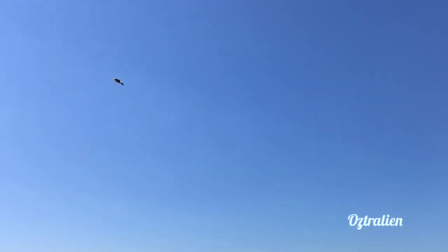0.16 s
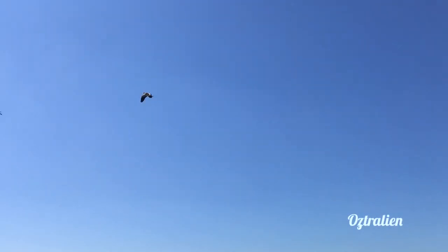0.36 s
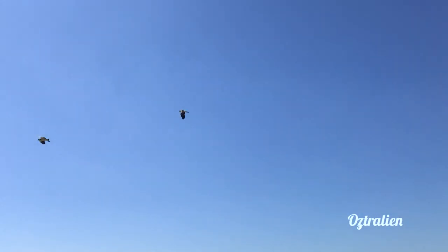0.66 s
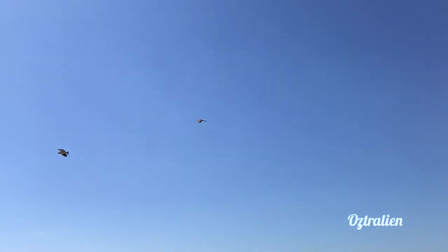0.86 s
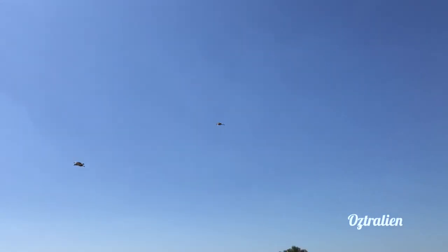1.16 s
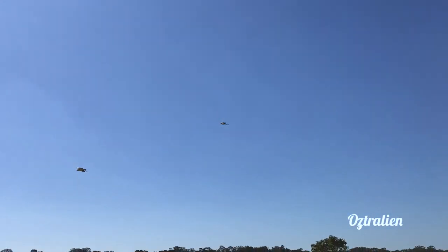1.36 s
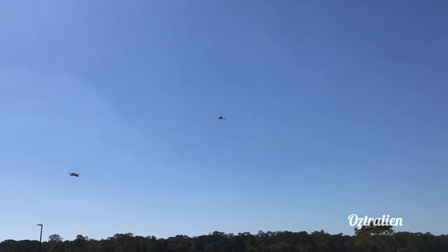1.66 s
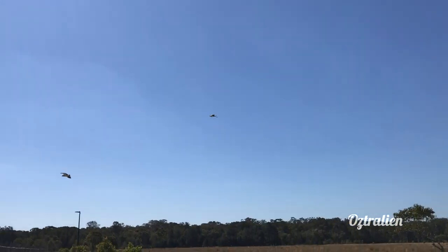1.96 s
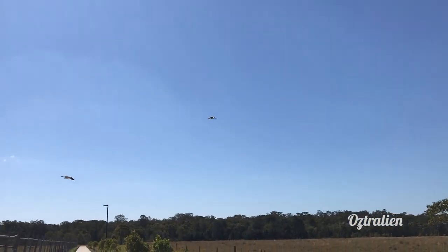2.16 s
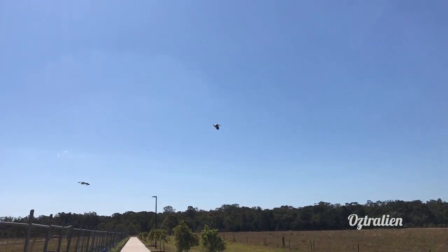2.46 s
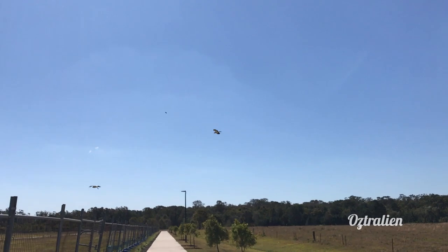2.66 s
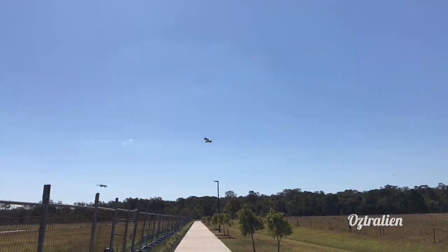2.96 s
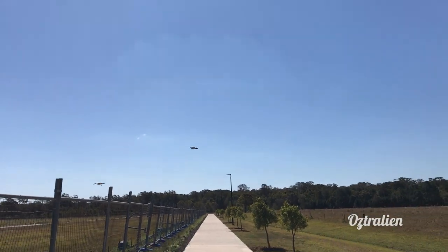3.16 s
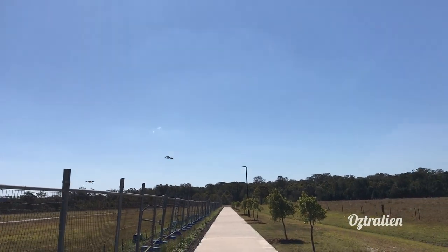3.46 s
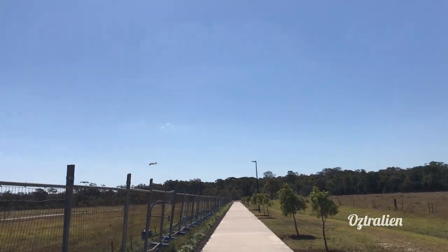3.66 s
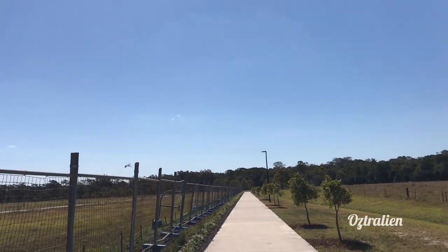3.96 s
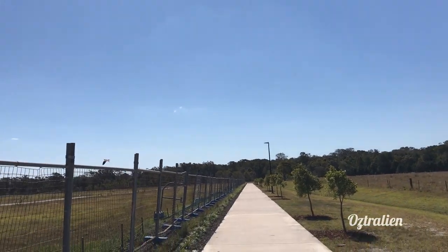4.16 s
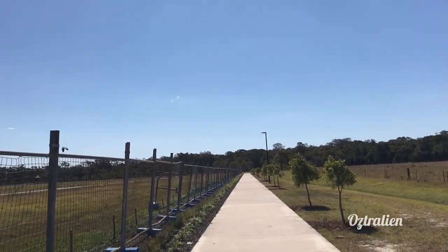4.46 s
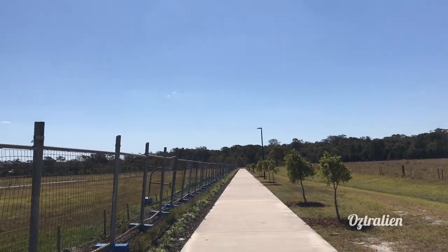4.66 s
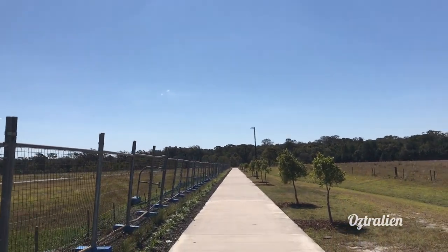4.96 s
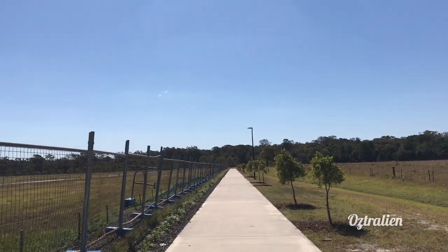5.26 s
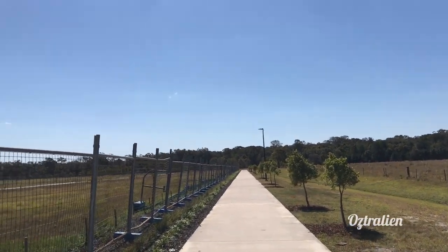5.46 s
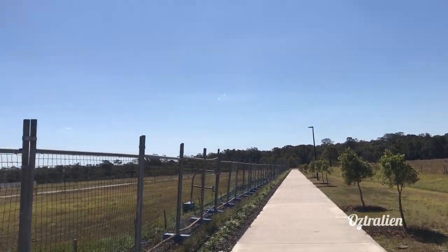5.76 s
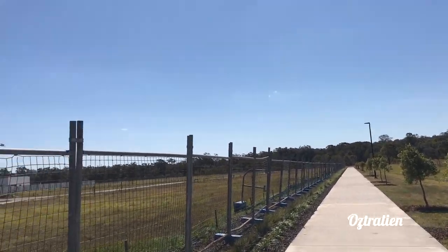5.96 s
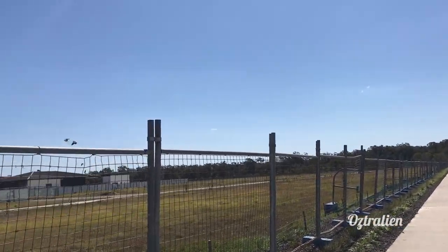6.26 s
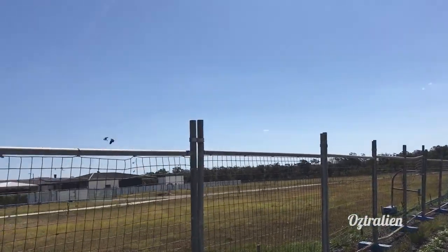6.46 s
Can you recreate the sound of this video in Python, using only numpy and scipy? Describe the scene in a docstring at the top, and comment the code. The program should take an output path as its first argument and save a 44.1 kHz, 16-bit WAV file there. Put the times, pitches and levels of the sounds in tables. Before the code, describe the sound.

Shrill, stuttering alarm calls from flying lapwings, close and dry with a slight echo off the ground and field. Two strong bursts come in the first half amid soft, bassy wind buffeting on an unprotected microphone. A quieter middle has weak far keks, small clicks and drawn-out calls; finally rapid keks mixed with short wails return as the air stays calm.

```python
"""Lapwings scolding over a windy field

Lapwings scold in bursts of stuttered 'kek' calls, with a few lower, drawn-out wails in between. Each voice is a
stack of harmonics shaped by a throat; the ground and field throw delayed copies back. Gusts of filtered noise
buffet the microphone, with short puffs on its port and a few small dry clicks. Behind it all lies a faint
background hush, made of noise whose middle range swells slowly."""
import sys
import numpy as np
from scipy import signal
from scipy.fft import rfft, irfft, next_fast_len
from scipy.io import wavfile

SR = 44100
rng = np.random.default_rng(int(sys.argv[2]) if len(sys.argv) > 2 else 0)


def store_pcm(level_fs):
    """Save levels as 16-bit WAV."""
    pcm = np.round(np.clip(level_fs, -1, 1) * 32767).astype(np.int16)
    wavfile.write(sys.argv[1], SR, np.atleast_2d(pcm).T)


N = 291060
TIME = np.arange(N) / SR

# a faint call is a far one: scatter and echo lose less than the direct sound as the level falls
NEAR_DB, SCATTER_DB_PER_DB, ECHO_DB_PER_DB = -40, .48, .68

# The short calls; an opening of 0 means a lone pip, a closing of 0 means no closing note:
# (time [s], opening length [s], short chirps [count], closing length [s], break after each rising chirp [s],
#  pitch [Hz], level of the last syllable [dB], 5-6 kHz presence [dB], top treble [dB])
KEKS = [(.252, .055, 0, .05, 0, 1250, -61, 5, -2), (.478, 0, 0, 0.05, 0, 1262, -32, 2.5, 9.5),
        (.625, .020, 1, 0.033, .001, 1280, -30.5, 3.5, 10.5),
        (.744, .017, 1, .040, .001, 1232, -30.5, 3.5, 9), (.869, .018, 2, 0.031, .002, 1206, -32, 2.5, 8.5),
        (1.115, 0.05, 1, 0.05, 0, 1230, -56, -3, 1), (1.357, 0.048, 0, 0.037, 0, 1158, -60.5, -3.5, -4),
        (1.539, .068, 0, .054, 0, 1178, -59.5, 2.5, -7), (2.123, .037, 0, .026, .001, 1285, -53.5, -7, -3),
        (2.258, 0.035, 0, 0.014, .002, 1305, -51, 1, -9), (2.309, 0, 0, .042, 0, 1245, -30, 6, 6.5),
        (2.418, .029, 1, 0.029, .002, 1218, -31.5, 5.5, 7.5),
        (2.534, 0.03, 0, 0.024, .001, 1215, -34, 4, 6), (2.636, .031, 1, 0.029, .003, 1218, -34.3, 6, 5.5),
        (2.747, .030, 1, .026, .004, 1202, -35.5, 6, 6.5),
        (2.901, .030, 0, 0.026, .004, 1217, -39, 4.5, 6.5),
        (3.014, .026, 0, 0.032, .005, 1205, -39.5, 5.5, 6.5),
        (3.228, 0.025, 0, 0.037, 0, 1252, -62, -4, -1), (3.363, 0.03, 1, 0.031, .004, 1275, -60, 1.5, -5),
        (3.513, .034, 1, .034, .005, 1250, -60, -1, 2), (3.685, 0.028, 0, 0.036, 0, 1215, -65.5, -5, -4),
        (4.005, .025, 0, 0.025, .004, 1295, -67.5, -2, -4),
        (4.095, .025, 2, 0.018, .007, 1130, -63.5, 1.5, -4),
        (4.227, 0.045, 0, 0.029, .006, 1144, -56.5, -1.5, -7),
        (5.435, 0.00042, 0, 0.025, 0, 1212, -48, -12, -12), (5.590, 0, 0, .041, 0, 1298, -37.5, 0, -7),
        (5.732, .019, 2, .029, .005, 1297, -37, 4, 3.5), (5.864, .020, 1, .025, .005, 1218, -34, 1, 3.5),
        (5.941, .019, 0, 0, .004, 1240, -46, -10, -4), (5.965, .028, 2, .030, .005, 1230, -37, 0, 5),
        (6.082, .029, 2, .031, .005, 1322, -42.3, -3, -4), (6.241, 0.037, 2, 0, .005, 1310, -45, -2, -8),
        (6.311, 0, 0, .047, 0, 1250, -40, 3, 4), (6.459, .025, 0, 0.022, .005, 1252, -40.5, 2.5, 4),
        (6.539, 0.027, 0, .025, .003, 1246, -38.5, 2, 3)]
# The drawn-out calls:
# (time [s], length [s], pitch [Hz], glide [Hz], level [dB], presence [dB], top treble [dB])
WAILS = [(4.465, 0.18, 1064, 48, -61, -6, -2), (4.753, 0.12, 1089, 16, -52, -3.5, -7),
         (5.201, 0.12, 1089, -15, -49.5, -1, 1), (5.784, 0.116, 1101, 0.5, -42, -6, -9),
         (6.564, 0.091, 1099, 0, -41.5, 2.5, -1)]


def lapwings(ground_db=-15.5, ground_s=0.0072, scatter_db=-18, wail_scatter_db=-11,
             echo_db=-8, kek_echo_db=-24, echo_s=0.105, doppler_hz=14):
    """Keks and wails with their reflections; the farther a bird, the larger the share from the field."""
    keks, to_scatter, wails, to_echo = np.zeros((4, N))
    for s, opening_s, count, closing_s, break_s, pitch_hz, db, presence_db, treble_db in KEKS:
        sound = undb(db) * call(opening_s, count, closing_s, break_s, pitch_hz, presence_db, treble_db)
        far_db = NEAR_DB - db
        add(keks, s, sound)
        add(to_scatter, s, undb(scatter_db + SCATTER_DB_PER_DB * far_db) * sound)
        add(to_echo, s, undb(kek_echo_db + ECHO_DB_PER_DB * far_db) * sound)
    for s, length, pitch_hz, glide_hz, db, presence_db, treble_db in WAILS:
        add(wails, s, undb(db) * wail(length, pitch_hz, glide_hz, presence_db, treble_db))
        # the bird flies towards the edge of the field, so its echo is a little higher
        higher = wail(length, pitch_hz + doppler_hz, glide_hz, presence_db, treble_db)
        add(to_echo, s, undb(db + echo_db) * higher)
    ground_lag_s = ground_s * (1 + 0.1095 * wobble(0.466, N))
    ground = undb(ground_db) * delayed(keks, ground_lag_s)
    echo = field(delayed(to_echo, echo_s), t60_s=0.14, build_s=.002)
    scatter = field(to_scatter + undb(wail_scatter_db) * wails, t60_s=0.8, build_s=0.009)
    return keks + wails + ground + echo + scatter


CRESCENDO_DB = 1.8  # each syllable is this much louder than the one before
LIFT_HZ_PER_S = 6000  # a chirp cut short by a longer break is pushed higher


def call(opening_s, count, closing_s, break_s, pitch_hz, presence_db, treble_db):
    """One kek: its syllables follow each other and build up to the last."""
    parts = syllables(opening_s, count, closing_s, break_s)
    out, s = np.zeros(SR // 2), 0
    for k, (length, silent_s, kind) in enumerate(parts):
        lifted_hz = pitch_hz + LIFT_HZ_PER_S * silent_s
        sound = syllable(length - silent_s, lifted_hz, presence_db, treble_db, kind)
        add(out, s, undb(CRESCENDO_DB * (k + 1 - len(parts))) * sound)
        s += length
    return out


STUTTER_S = .0185  # from one short chirp to the next

# Four kinds of syllable: a rising opening, a short rising chirp, a falling closing note, a lone pip:
# (pitch against the call's [ratio], glide [Hz], arch [Hz], rasp [0-1], time for the rasp to settle [s],
#  place of the peak [0-1], bite of the onset [0-1])
OPENING = (.985, 200, 0, .55, .0065, .56, .07)
CHIRP = (1.02, 185, 10, .52, .0042, .47, .1)
CLOSING = (1.0, -100, 30, .33, .004, .39, .12)
PIP = (1.0, 25, 80, .27, .0045, .48, .035)


def syllables(opening_s, count, closing_s, break_s):
    """The syllables of one kek in order: (time until the next [s], silent part of it [s], kind)."""
    if opening_s <= 0:
        return [(closing_s, 0, PIP)]
    rising = [(opening_s, break_s, OPENING)] + [(STUTTER_S, break_s, CHIRP)] * round(count)
    if closing_s > 0:
        return rising + [(closing_s, 0, CLOSING)]
    return rising


def syllable(length, pitch_hz, presence_db, treble_db, kind, dull_db=5, quiver_db=.7,
             hoarse=.23, scoop=.028, drawl=.45, fullness=.9):
    """A rasping catch, then an arched tone; the kind sets where it peaks, and long ones glide less."""
    ratio, glide_hz, arch_hz, rasp, settle_s, peak, bite = kind
    t = np.arange(int(length * SR)) / SR
    u = t / length
    start = np.exp(-t / settle_s)
    # pitch: a scoop from below, a straight glide and an arch
    scooped_hz = pitch_hz * ratio * (1 - scoop * start)
    glide = glide_hz * (STUTTER_S / length) ** drawl * (u - .5)
    hz = scooped_hz + glide - arch_hz * (2 * u - 1) ** 2
    # bend time so that the half sine peaks at the wanted place
    bend = np.log(.5) / np.log(min(peak, .9))
    swell = abs(np.sin(np.pi * u ** bend)) ** fullness
    breakout = bite * start * np.minimum(t / 0.0012, 1)
    # the membranes close hardest at full pressure, so the edges of a syllable are duller
    soft_db = dull_db * (swell - 1)
    pressure = unit((swell + breakout) * undb(quiver_db * wobble(90, len(t))))
    rough = rasp * (1.8 * start + hoarse)
    return pressure * syrinx(hz, rough, presence_db + soft_db / 2, treble_db + soft_db)


# How a wail runs its course: (share of its length [0-1], pitch [ratio], level [dB])
WAIL_SHAPE = [(0, .94, -16), (.12, 1.015, -1), (.33, .997, -2.5), (.55, .983, -1.5), (.75, .995, 1.5),
              (.93, .983, 4), (1, 0.94, -3.5)]


def wail(length, pitch_hz, glide_hz, presence_db, treble_db, tremor_db=1.9):
    """A lower, clear, held call: nearly even membrane pulses with a slight quaver."""
    u = np.linspace(0, 1, int(length * SR))
    share, ratio, db = np.transpose(WAIL_SHAPE)
    waver = 1 + .004 * wobble(60, len(u))
    hz = (pitch_hz + glide_hz * (u - .5)) * np.interp(u, share, ratio) * waver
    swell = unit(undb(np.interp(u, share, db) + tremor_db * wobble(86, len(u))))
    voice = swell * syrinx(hz, .06, presence_db, treble_db)
    return colour(voice, [(1100, -0.5), (2200, -0.5), (3200, 0.5), (6000, 1.5),
                          (7200, 0), (9000, 3.5), (14000, -15)])


# How throat and open bill favour some pitches: (frequency [Hz], relative level [dB])
THROAT = [(1050, -19.5), (1280, -14), (2100, 1.6), (2500, 0.3), (3750, 2), (5000, -10), (6250, -10.5),
          (7300, -29), (8700, -29.2), (10000, -31), (11400, -30.5), (13500, -32.5), (15500, -44)]


def syrinx(hz, rough, presence_db, treble_db, jitter=0.053, shimmer=1.0, flutter_hz=700,
           scatter_db=0.0, drift_db=2, count=13):
    """Membrane pulses through the throat; when rough, cycles vary in length and strength."""
    size = len(hz)
    uneven_hz = hz * (1 + jitter * rough * wobble(flutter_hz, size))
    phase = 2 * np.pi * np.cumsum(uneven_hz) / SR
    strength = 1 + np.tanh(shimmer * rough * wobble(flutter_hz, size))
    k = np.arange(1, count + 1)[:, None]  # harmonic numbers
    # the bill beams its upper harmonics: they change from call to call as the bird turns
    upper = np.clip((k * hz - 3900) / 800, 0, 1)
    top = np.clip((k * hz - 6600) / 1900, 0, 1)
    beam_db = (upper - top) * presence_db + top * treble_db
    drift = np.array([wobble(61, size) for _ in range(count)])
    gain = undb(spectrum_db(THROAT, k * hz) + beam_db + (scatter_db + drift_db * top) * drift)
    # the windpipe rings, spreading each pulse over its cycle
    spread = np.pi * k ** 2 / (2 * count) + .5 * drift
    pulses = strength * np.sum(gain * np.cos(k * phase - spread), axis=0)
    # scale by the second and third harmonics
    body = np.sqrt(np.mean(np.sum(gain[1:3] ** 2, axis=0)) / 2)
    return pulses / body


def field(x, t60_s, build_s):
    """Scatter from grass, fence and trees: a thin, fading noise tail that has lost its top."""
    t = TIME[:SR]
    tail = rng.standard_normal(SR) * undb(-60 * t / t60_s) * (1 - np.exp(-t / build_s))
    tail = colour(tail, [(1200, -5.0), (2500, -2.5), (4000, -5.5), (6200, -5.5),
                         (9000, -4.0), (15000, -30)])
    return signal.fftconvolve(x, unit(tail))[:N] / np.sqrt(SR * np.pi)


# Tone of the wind, low rumble and higher buffeting: (frequency [Hz], relative level [dB per Hz])
RUMBLE = [(12, -43.5), (25, -18.5), (38, 11), (55, 18.5), (85, 16), (130, 5), (250, -56.5)]
BUFFET = [(50, -11.5), (110, 2.5), (180, 2.5), (270, -5), (400, -16.5), (600, -23.5), (900, -39.5),
          (1400, -54), (2500, -78), (6000, -96)]


def wind(rumble_db=-1, buffet_db=-1, flicker_db=1.5, own_db=1.6, reach=0.48, usual_db=-37):
    """Eddies on the microphone: a low rumble, and buffeting that reaches higher in stronger gusts."""
    low_db, gust_db = wind_force()
    eddies_db = flicker_db * wobble(57, N)
    out = unit(colour(rng.standard_normal(N), RUMBLE)) * undb(low_db + rumble_db)
    force_db = np.maximum(gust_db - usual_db, -10)
    for hz, band in octaves(BUFFET):
        # small eddies, which make the upper bands, come and go most abruptly
        height = np.clip(np.log2(hz / 180), 0, 2)
        shared_db = eddies_db * (1.5 + 0.78 * height)
        reach_db = reach * force_db * height
        band_db = gust_db + buffet_db + shared_db + reach_db + own_db * wobble(52, N)
        out += band * undb(band_db)
    return out


# Steady breeze, before the trims in wind(): (time [s], rumble level [dB], buffeting level [dB])
BREEZE = [(0, -59.5, -67), (.28, -53, -62.5), (.55, -40, -47.5), (.9, -40.5, -43), (1.3, -44.5, -43),
          (1.7, -42, -39.5), (1.95, -43, -49.5), (2.2, -49, -52), (2.4, -43, -43.5), (2.6, -55, -43),
          (2.9, -44, -41.5), (3.2, -46, -50.5), (3.45, -50, -67.5), (4.0, -45.5, -58.5), (4.35, -58, -68),
          (5.55, -57, -67), (5.72, -50.5, -60), (6.6, -52, -66)]
# Gusts that swell and die on top of it, before the same trims:
# (time of the middle [s], length [s], level [dB])
GUSTS = [(0.353, .11, -31.5), (0.781, 0.15, -36.5), (.88, 0.15, -35.5), (1.054, .1, -35), (1.206, .14, -41),
         (1.435, .16, -33), (1.509, .16, -31), (1.605, .16, -29.5), (1.70, .15, -34), (1.872, .12, -35),
         (2.038, .075, -33), (2.429, .19, -38), (2.694, .2, -37.5), (2.854, 0.16, -35),
         (2.941, 0.12, -31.5), (3.083, 0.11, -35), (3.328, .14, -33.5), (3.528, 0.061, -47),
         (3.749, .07, -42.5), (4.865, 0.13, -53.5), (6.067, 0.12, -53), (6.521, 0.067, -44.5)]


def wind_force(gust_rumble_db=-6, waver_db=2, waver_hz=12, steepness=1.3):
    """Rumble and buffeting levels [dB]: each gust is a smooth swell adding its power to the breeze."""
    low_db, buffet_db = curve(BREEZE)
    power = np.zeros(N)
    for s, length, db in GUSTS:
        swell = abs(np.hanning(int(length * SR))) ** steepness
        add(power, s - length / 2, undb(db) ** 2 * swell)
    breeze_power = undb(low_db + waver_db * wobble(waver_hz, N)) ** 2
    rumble_power = breeze_power + undb(gust_rumble_db) ** 2 * power
    return 10 * np.log10(rumble_power), 10 * np.log10(undb(buffet_db) ** 2 + power)


# Sharp eddies that strike the microphone port: (time [s], length [s], level [dB])
EDDIES = [(0.335, 0.042, -36), (0.869, 0.023, -36.5), (1.031, 0.032, -46.5), (1.587, 0.089, -40),
          (2.922, 0.039, -36), (3.072, 0.016, -46.5)]


def eddies():
    """Short puffs on the port, brighter than the gusts: noise under a smooth rise and fall."""
    out = np.zeros(N)
    for s, length, db in EDDIES:
        puff = unit(colour(rng.standard_normal(SR // 2), [
            (120, -19), (300, -6), (520, 3), (800, -10.5), (1200, -19), (2400, -52), (6000, -79)]))
        size = int(length * SR)
        add(out, s, undb(db) * np.hanning(size) * puff[:size])
    return out


# Small clicks near the microphone: (time [s], tick level [dB], knock level [dB], knock pitch [Hz])
CLICKS = [(2.024, -65, -80, 900), (4.257, -61, -68, 1800), (4.279, -63, -68, 1800), (4.328, -64, -72, 1800),
          (4.559, -51, -62, 900), (4.574, -57, -45, 650), (4.703, -70, -57, 2600), (4.718, -70, -54, 1800)]


def clicks(tick_s=0.0017, knock_s=0.0046, size=4096):
    """Small dry contacts: a bright tick over a short dull knock, both fast-fading noise."""
    out, t = np.zeros(N), TIME[:size]
    for s, tick_db, knock_db, hz in CLICKS:
        bright = colour(rng.standard_normal(size), [(1500, -10), (6000, 0), (15000, 2)])
        dull = colour(rng.standard_normal(size), [(hz / 4, -20), (hz, 0), (hz * 2, -14), (hz * 4, -40)])
        tick = unit(bright) * np.exp(-t / tick_s)
        knock = unit(dull) * np.exp(-t / knock_s)
        add(out, s, undb(tick_db) * tick + undb(knock_db) * knock)
    return out


# Tone of the background hush: (frequency [Hz], relative level [dB per Hz])
HUSH = [(40, 7), (150, -6.5), (350, -4.5), (500, -13), (900, -16.5), (1500, -19), (2200, -25.5),
        (4000, -28.5), (7000, -35), (15500, -38)]
# How it swells, in full only around 1600 Hz: (time [s], level [dB])
SWELL = [(0, 1), (1, 2), (2.2, 0), (3.2, 3.5), (3.6, 10), (3.95, 10.5), (4.3, 7), (5.1, 5), (5.7, 7),
         (6.6, 9.5)]


def hush(level_db=-62, flicker_db=1):
    """A faint background hush: noise whose middle range swells while the top hiss stays more even."""
    swell_db, = curve(SWELL)
    out = np.zeros(N)
    for hz, band in octaves(HUSH):
        share = np.exp(-(np.log2(hz / 1600) / 2) ** 2)
        out += band * undb(share * (swell_db + flicker_db * wobble(5.3, N)))
    return undb(level_db) * out


def undb(db):
    """Decibels to gain."""
    return 10 ** (np.asarray(db) / 20)


def unit(x):
    """Scale to an average (rms) strength of 1."""
    return x / np.sqrt(np.mean(x ** 2) + 1e-20)


def spectrum_db(points, hz):
    """Read (frequency [Hz], level [dB]) points on a log-frequency axis."""
    f, db = np.transpose(points)
    return np.interp(np.log(np.maximum(hz, 1)), np.log(f), db)


def curve(rows):
    """The columns of a time table at every sample."""
    s, *columns = np.transpose(rows)
    return [np.interp(TIME, s, c) for c in columns]


def colour(x, points):
    """Filter by a (frequency [Hz], level [dB]) spectrum."""
    gain = undb(spectrum_db(points, np.fft.rfftfreq(len(x), 1 / SR)))
    return irfft(rfft(x) * gain, len(x))


def wobble(rate_hz, size):
    """Smooth random curve of spread about 1; changes much faster than the rate are faded out."""
    padded = next_fast_len(2048 * (size // 2048 + 2))
    f = np.fft.rfftfreq(padded, 1 / SR)
    slow = rfft(rng.standard_normal(padded)) * np.exp(-(f / rate_hz) ** 2)
    return unit(irfft(slow))[:size]


def octaves(points):
    """Noise of rms 1 with the given spectrum, split into (centre [Hz], overlapping octave band)."""
    whole = rfft(unit(colour(rng.standard_normal(N), points)))
    place = np.log2(np.maximum(np.fft.rfftfreq(N, 1 / SR), 1))
    for k in range(4, 15):
        yield 2. ** k, irfft(whole * np.maximum(1 - abs(place - k), 0), N)


def add(out, s, x):
    """Mix x into out from time s on."""
    i = min(max(int(s * SR), 0), N)
    out[i:i + len(x)] += x[:N - i]


def delayed(x, lag_s):
    """Delay by a fixed or moving time."""
    return np.interp(TIME - lag_s, TIME, x, left=0)


def scene():
    """Birds, wind, puffs, hush and clicks at one microphone."""
    return (lapwings() + wind() + eddies() + hush() + clicks())[None]


def record(dry, low_hz=32, top_hz=15750):
    """The microphone sheds the deepest rumble and the recorder cuts the top steeply."""
    low_cut = signal.butter(2, low_hz, "high", fs=SR, output="sos")
    top_cut = signal.ellip(10, .2, 70, top_hz, fs=SR, output="sos")
    return signal.sosfilt(top_cut, signal.sosfilt(low_cut, dry))


dry = scene()
out = record(dry)
store_pcm(out)
```